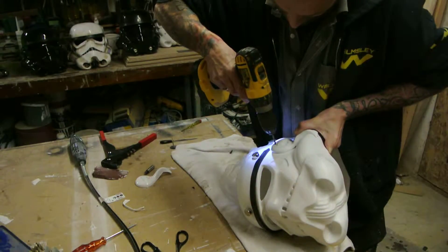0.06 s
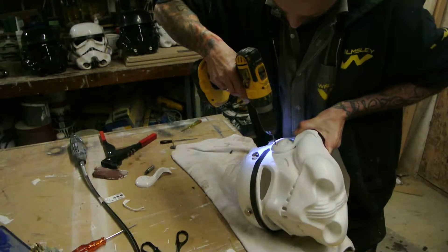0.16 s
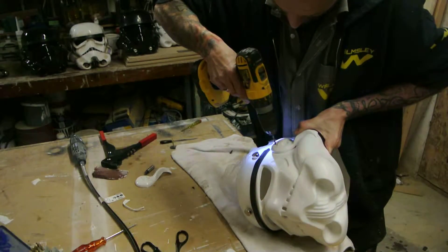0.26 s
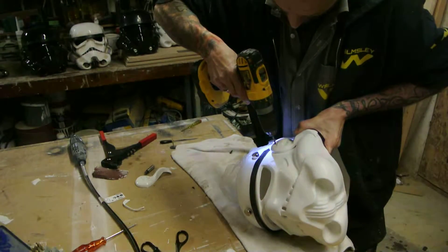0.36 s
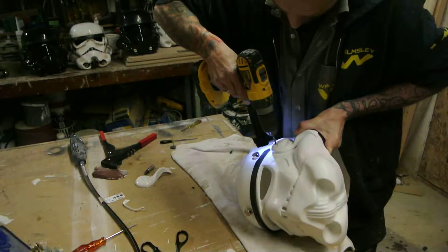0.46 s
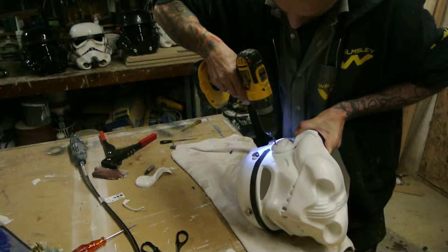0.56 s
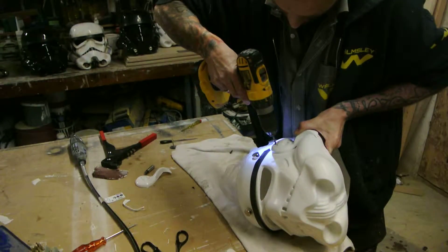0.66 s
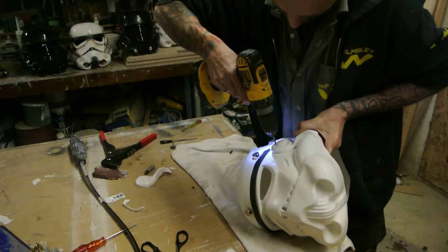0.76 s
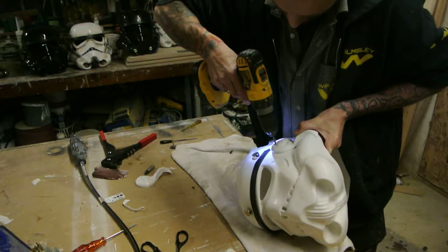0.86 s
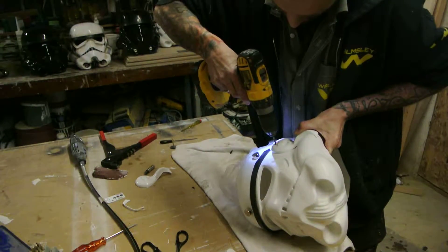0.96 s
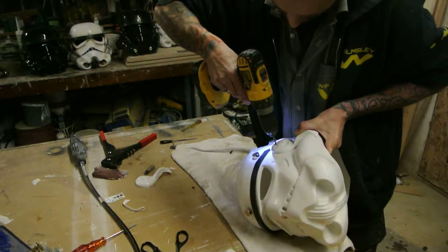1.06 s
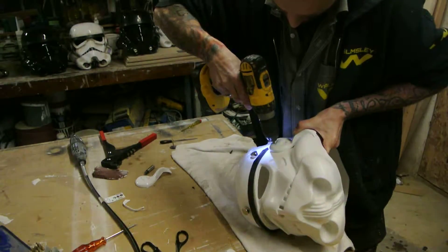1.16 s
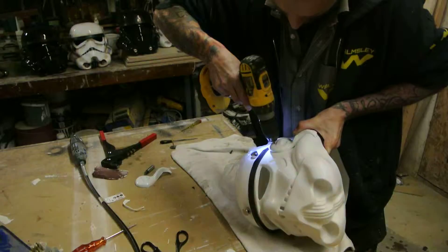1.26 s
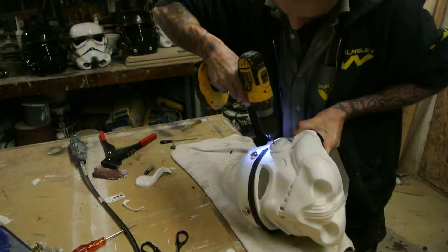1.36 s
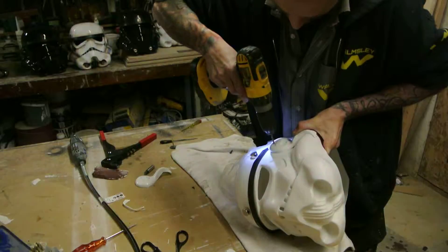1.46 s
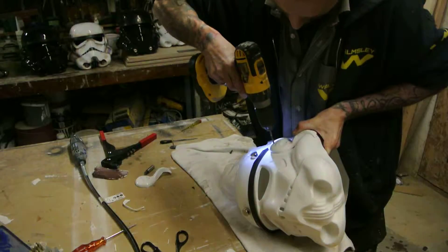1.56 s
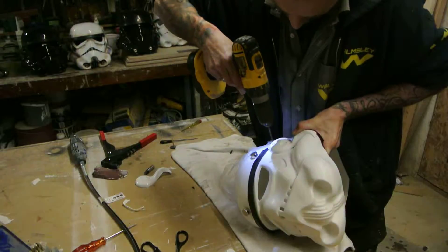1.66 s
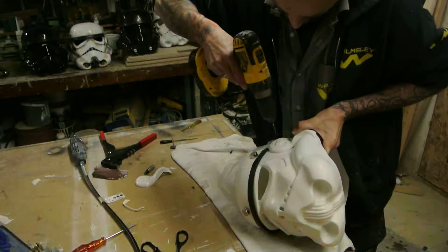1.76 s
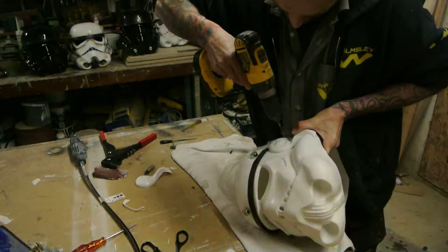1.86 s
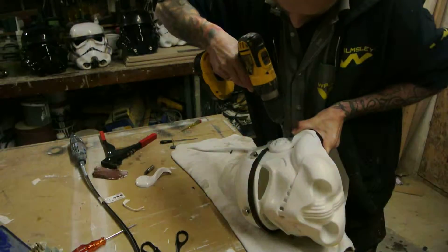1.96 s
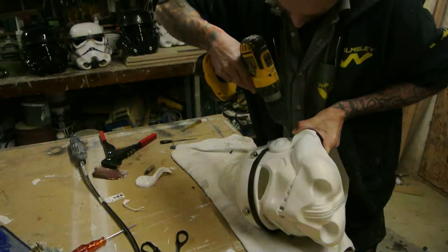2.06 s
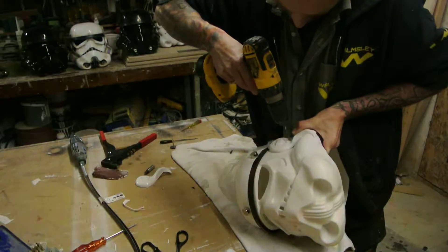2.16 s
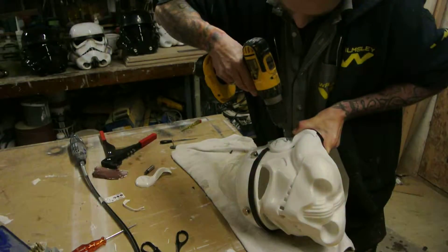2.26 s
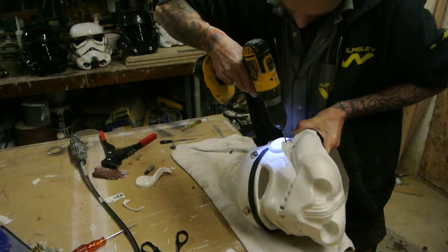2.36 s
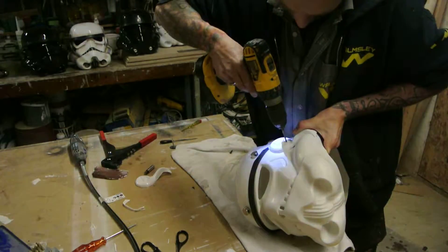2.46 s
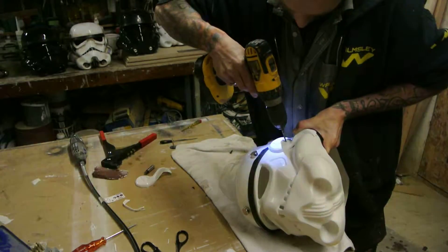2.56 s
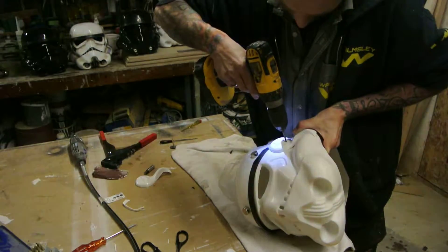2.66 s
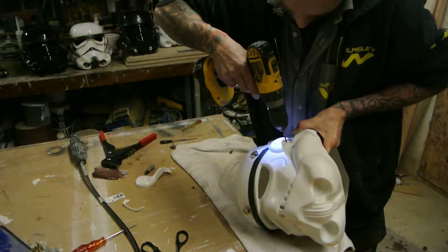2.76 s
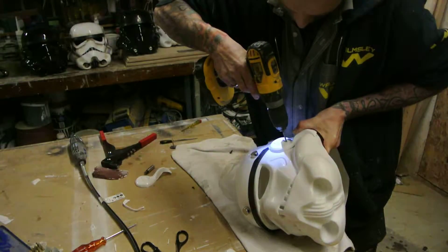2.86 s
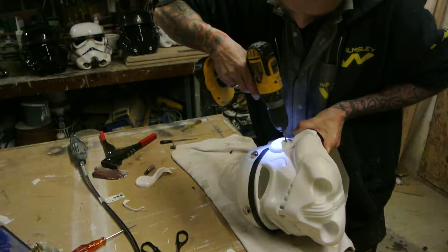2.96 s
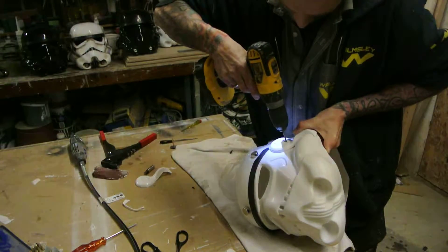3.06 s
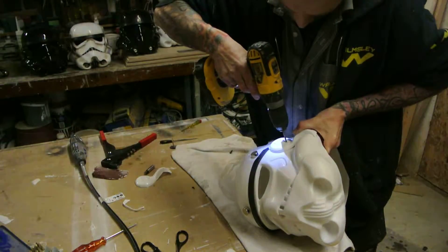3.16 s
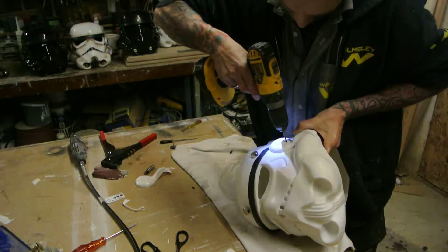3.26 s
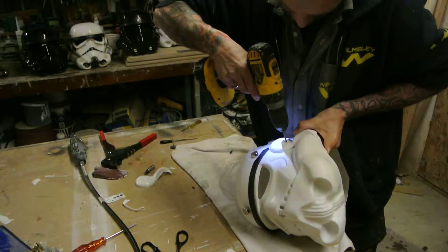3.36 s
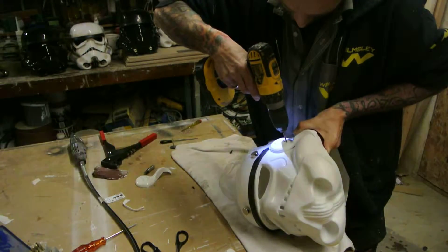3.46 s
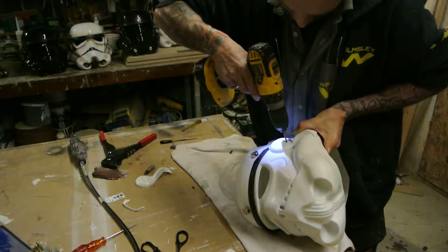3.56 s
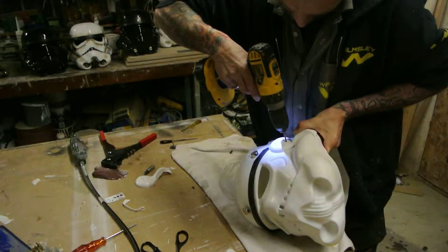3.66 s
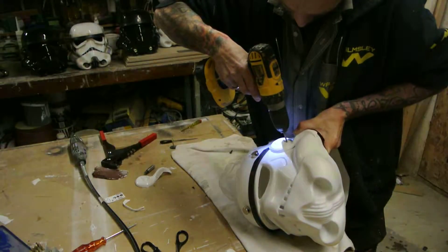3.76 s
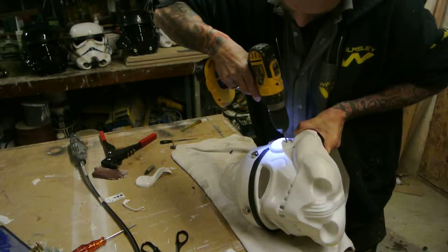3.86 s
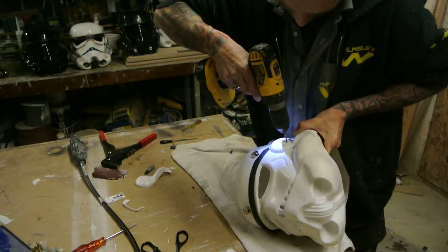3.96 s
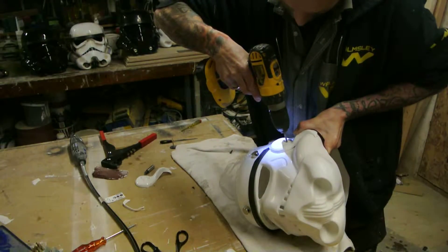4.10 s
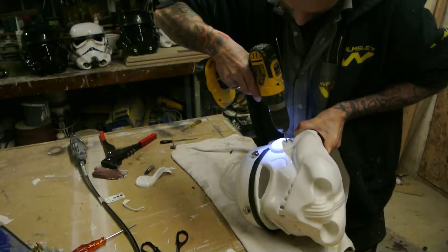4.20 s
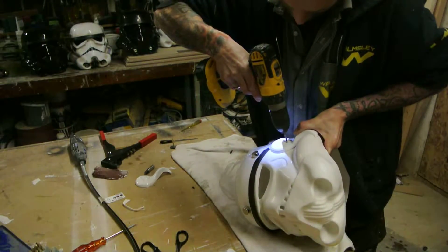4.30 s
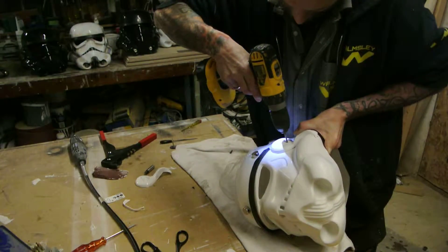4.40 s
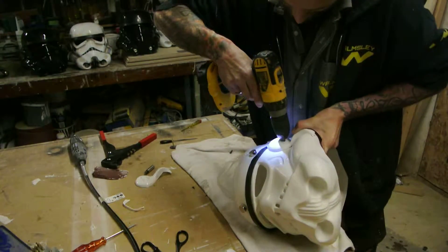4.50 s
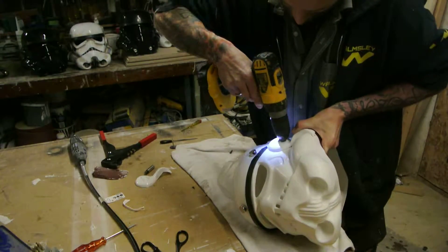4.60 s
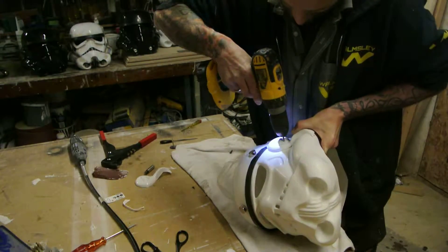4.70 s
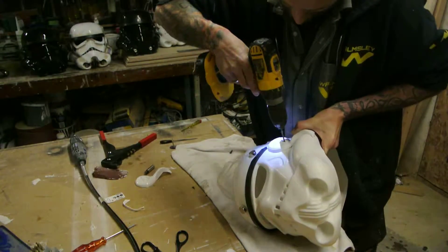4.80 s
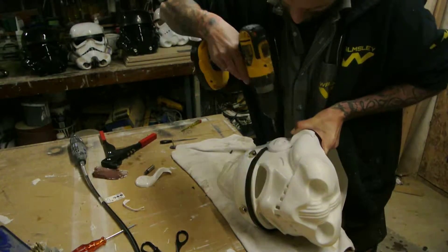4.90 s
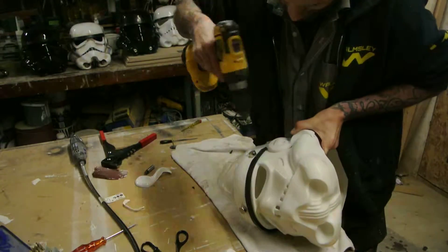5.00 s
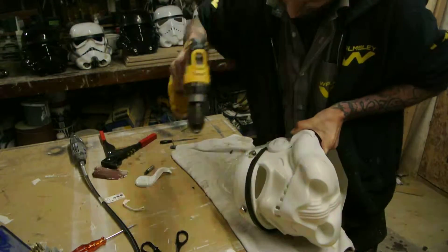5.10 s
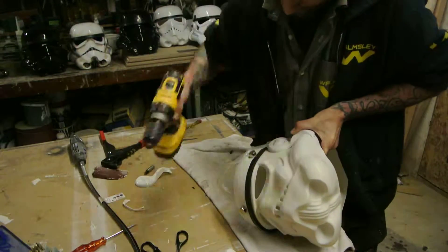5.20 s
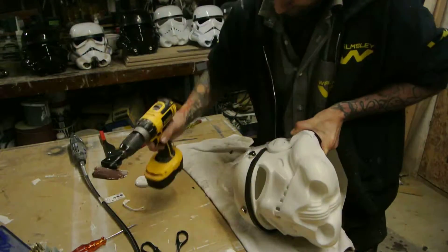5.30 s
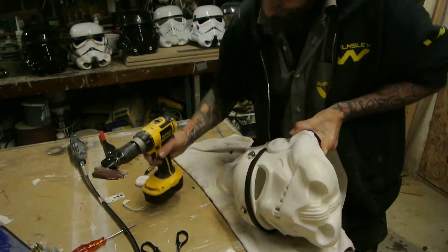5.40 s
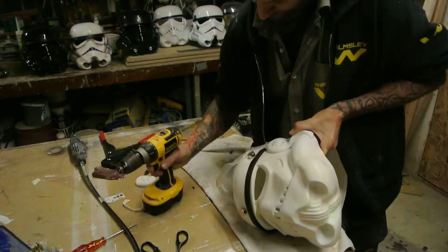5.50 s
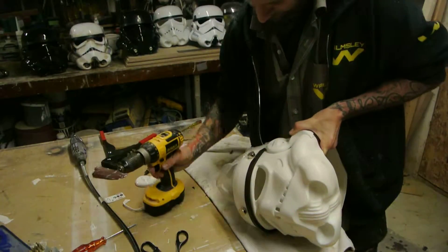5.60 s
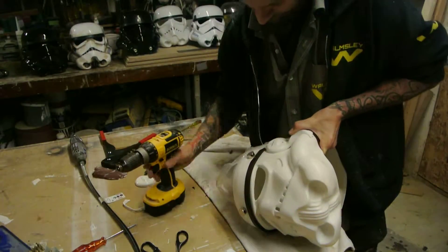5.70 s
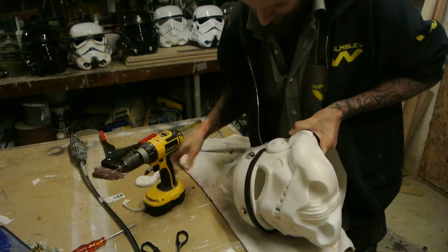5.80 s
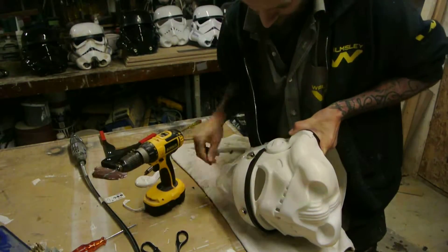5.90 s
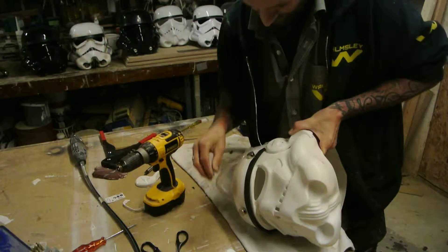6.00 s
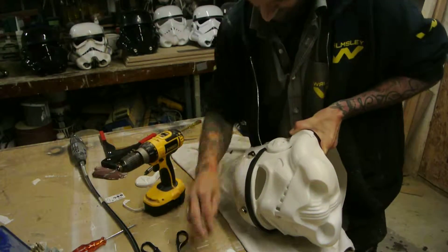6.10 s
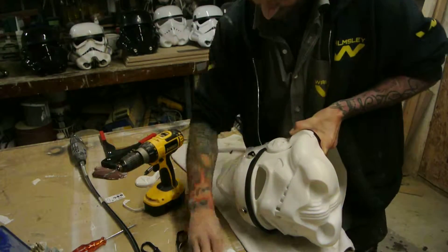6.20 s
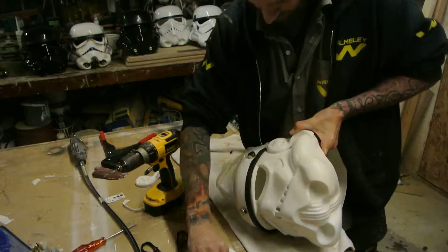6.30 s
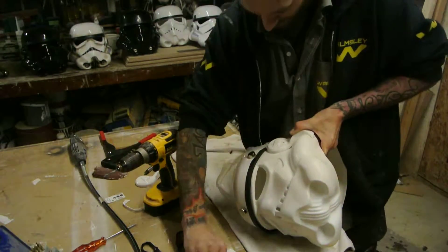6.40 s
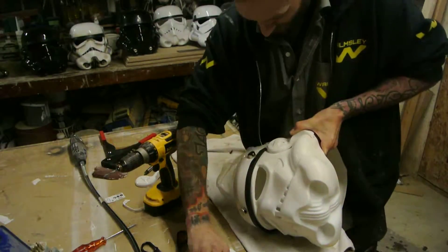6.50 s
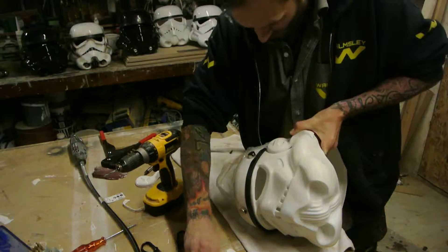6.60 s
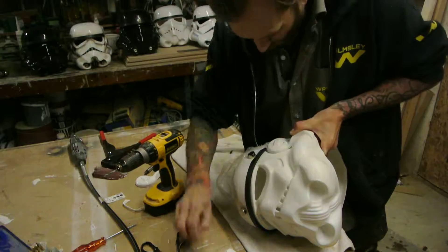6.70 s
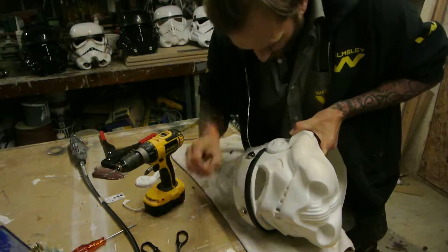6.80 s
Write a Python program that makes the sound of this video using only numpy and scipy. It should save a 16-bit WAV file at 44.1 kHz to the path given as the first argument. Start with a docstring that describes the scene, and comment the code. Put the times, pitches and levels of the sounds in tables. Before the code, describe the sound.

From the very start a cordless drill runs at full speed close to the microphone: a high gear whine, coarse bright rasp and airy fan. The plastic shell drones beneath it, biting briefly around 0.4 s and juddering harder from 1.1 to 1.5 s; the drone drops near 1.6 s as the bit breaks through. At 1.86 s the motor brakes with a fast cluster of steel clacks. A quiet gap holds soft hiss and a faint tap at 2.4 s. Thin chirps lead into a rising second burst from 2.54 s, with a deep juddering bite around 4.5 s, ending at 4.97 s in a sharp double clack. Cloth rustles lightly; at 5.59 s the drill lands on the wooden bench with a hard, rattling thud. Sleeve and palm swish, strongest at 6.45 s with a bright click, then a faint finger squeak near 6.8 s over rising hiss and slight hum. Short workshop echo.

```python
"""A cordless drill bores two holes in a hollow plastic shell, close to a two-port microphone.
Its shaft drives whining gear tones, a noisy rasp and a fan; the shell drones and judders as shaped noise.
Short noise bursts make the clacks of the spindle lock, the small knocks and the landing on a wooden bench.
Swelling noise makes the rustling sleeve and the hand that brushes over the bench top.
The place is a small workshop: the bench top answers first, then shelves and walls, over hiss and hum."""
import sys
import numpy as np
from scipy import signal
from scipy.fft import rfft, irfft, next_fast_len
from scipy.io import wavfile
from scipy.ndimage import map_coordinates

SR = 44100
rng = np.random.default_rng(int(sys.argv[2]) if len(sys.argv) > 2 else 0)


def materialize(psi):
    """Save the field psi as 16-bit PCM at rate SR to the path in sys.argv[1].

    A 1-D psi becomes a single channel; in a 2-D psi each row is a channel.
    """
    bounded = np.clip(np.atleast_2d(psi).T, -1, 1)
    quanta = np.round(bounded * 32767).astype(np.int16)
    wavfile.write(sys.argv[1], SR, quanta)


N = 302085


def amp(db):
    """Decibels to gain."""
    return 10 ** (np.asarray(db) / 20)


def unit(x):
    """Scale to rms 1."""
    return x / np.sqrt(np.mean(x ** 2) + 1e-20)


def clock():
    """The time of every sample in seconds."""
    return np.arange(N) / SR


def along(points, hz):
    """Read (frequency [Hz], value) points on a log frequency axis."""
    f, v = np.transpose(points)
    return np.interp(np.log(hz + 1), np.log(f + 1), v)


def curves(rows):
    """One value per sample for each column after the time."""
    s, *columns = np.transpose(rows)
    return [np.interp(clock(), s, column) for column in columns]


def ramp(start, length):
    """Rises from 0 at start to 1 over length seconds."""
    return np.clip((clock() - start) / length, 0, 1)


def swell(s, rise, hold, fall):
    """Gain that peaks at s and holds; rise and fall are the seconds that 20 dB take."""
    t = clock()
    before = np.maximum(s - t, 0)
    after = np.maximum(t - s - hold, 0)
    return amp(-20 * (before / abs(rise) + after / abs(fall)))


def wobble(rate):
    """A smooth random curve with rate knots a second."""
    t = clock()
    coarse = t[::32]
    knots = rng.standard_normal(int(N * rate / SR) + 4)
    return np.interp(t, coarse, map_coordinates(knots, [coarse * rate]))


def filtered(x, response):
    """Multiply the spectrum of x by a response given as a function of frequency."""
    n = x.shape[-1]
    m = next_fast_len(n + 8192)
    return irfft(rfft(x, m) * response(np.fft.rfftfreq(m, 1 / SR)), m)[..., :n]


def noise(spectrum, size=N):
    """Noise of rms 1, coloured by (frequency [Hz], relative level [dB per Hz]) points."""
    return unit(filtered(rng.standard_normal(size), lambda hz: amp(along(spectrum, hz))))


def dying(x, decay):
    """Each frequency of x fades with its own t60, the seconds that 60 dB take."""
    hz, t, z = signal.stft(x, SR, nperseg=256)
    fade = amp(-60 * t / along(decay, hz)[:, None])
    return signal.istft(z * fade, SR, nperseg=256)[1][:len(x)]


def add(track, s, sound):
    """Mix a sound into a track at time s."""
    part = track[round(s * SR):][:len(sound)]
    part += sound[:len(part)]


def blow(spectrum, t60, ring_db, ring_t60):
    """A hard contact: a short crack and a weaker dense ring."""
    t = np.arange(SR // 2) / SR
    envelope = amp(-60 * t / t60) + amp(ring_db - 60 * t / ring_t60)
    return noise(spectrum, size=len(t)) * envelope


# Diffuse sound at the two microphone ports: (frequency [Hz], left-right likeness [0-1])
PORT_LIKENESS = [(60, .7), (150, .88), (400, .6), (1000, .35), (3000, .15), (8000, 0)]


def diffuse(a, b):
    """Two unrelated signals as a stereo pair: alike in the bass, apart in the treble."""
    def turn(hz):
        return np.arccos(np.clip(along(PORT_LIKENESS, hz), -1, 1)) / 2
    mid = filtered(a, lambda hz: np.cos(turn(hz)))
    side = filtered(b, lambda hz: np.sin(turn(hz)))
    return np.array([mid + side, mid - side])


def radiated(x):
    """A small housing radiates no bass."""
    return filtered(x, lambda hz: 1 - 1 / (1 + (hz / 260) ** 8))


# Reverberation of the workshop: (frequency [Hz], t60 [s])
ROOM_DECAY = [(100, 0.16), (600, 0.35), (3000, 0.3), (12000, .24)]


def placed(x, near_db, wet_db, lag_ms):
    """Direct sound reaches the left port lag_ms late; the bench top answers at once, shelves and walls later."""
    def answer(decay, wait):
        """A stereo echo tail that starts after wait samples."""
        tails = [dying(rng.standard_normal(SR // 2), decay) for _ in range(2)]
        return diffuse(*[np.pad(h / np.linalg.norm(h), (wait, 0))[:SR // 2] for h in tails])

    near, wet = amp(near_db), amp(wet_db)
    echoes = near * answer([(1000, 0.017)], wait=12) + wet * answer(ROOM_DECAY, wait=200)
    sides = np.array([[-1], [1]])  # half the lag on each side
    direct = filtered(x, lambda hz: np.exp(1j * np.pi * hz * lag_ms / 1000 * sides))
    reflected = signal.fftconvolve(x[None], echoes, axes=1)[:, :N]
    return (direct + reflected) / np.sqrt(1 + (near ** 2 + wet ** 2) / 2)


def running(on, off, coast_t60):
    """1 while the trigger is held, then a quick fade as the motor brakes."""
    return ramp(on, .004) * amp(-60 * np.maximum(clock() - off, 0) / coast_t60)


FULL_RPS, TIRING_RPS_PER_S = 357.4, 1.0  # free turns per second at time 0; the loss as the battery tires
SQUEEZE_S, INERTIA_S = .16, .093  # the trigger goes down; the motor follows with a lag
EASE_S, EASE_SLOWS, BRAKE_S = .08, .11, .04  # easing before release, share of speed it costs, brake time constant
GRAB_S, RECOVER_S = .055, .08  # time of the speed drop; recovery time constant before half the bite is added
# The bit touches the plastic or bites into it:
# (time [s], length [s], sag at full trigger [turns per second], relative shell level [dB])
BIT_BITES = [(.39, .06, 3.6, -43), (1.13, .35, 4.8, -41.5), (2.38, .04, 0, -55), (3.69, .1, 2.8, -50),
             (4.47, .34, 4.2, -41)]


def motor(on, off):
    """Speed follows the trigger and sags in each bite; also returns strain and finger easing, both 0-1."""
    t = clock()
    squeezed = SQUEEZE_S * ramp(on, SQUEEZE_S)
    held = np.maximum(t - on - SQUEEZE_S, 0)
    behind = INERTIA_S * (1 - np.exp(-squeezed / INERTIA_S)) * np.exp(-held / INERTIA_S)
    ease = ramp(off - EASE_S, EASE_S) ** 2
    braking = np.exp(-np.maximum(t - off, 0) / BRAKE_S)
    share = (squeezed - behind) / SQUEEZE_S * (1 - EASE_SLOWS * ease) * braking
    sag = np.zeros(N)
    for s, length, rps, _ in BIT_BITES:
        recovery = np.exp(-np.maximum(t - s - GRAB_S, 0) / (RECOVER_S + length / 2))
        sag += rps * ramp(s, GRAB_S) * recovery
    strain = np.clip((1 - share) / .25, 0, 1)  # pulls harder while speeding up or braking; bites leave it alone
    return share * (FULL_RPS - TIRING_RPS_PER_S * t - sag), strain, ease


# The two strongest gear tones, as multiples of the shaft speed
STRONG_ORDERS = (14, 21)
# Their relative levels: (time [s], order 14 [dB], order 21 [dB])
STRONG_LEVELS = [(0.0, -28, -32), (1.16, -28, -29), (1.26, -33, -35), (1.5, -26, -27), (1.56, -30, -40),
                 (1.66, -41, -35), (1.78, -31, -28), (1.84, -39, -38), (2.72, -45, -47), (2.82, -35, -36),
                 (3.18, -29, -31), (3.26, -29, -47), (3.68, -31, -44), (3.82, -30, -25), (3.96, -32, -47),
                 (4.34, -29, -38), (4.82, -29, -29), (4.94, -46, -41)]
# The other shaft orders: (multiple of the speed, relative level in the first hole [dB], in the second [dB])
WEAK_ORDERS = [(1, -51, -49), (2, -52, -53), (7, -50, -44), (8, -47, -48), (12, -52, -48), (15, -46, -42),
               (16, -46, -43), (17, -33, -38), (18, -47, -49), (19, -42, -42), (20, -47, -46),
               (22, -42, -38), (23, -48, -40), (24, -47, -47), (25, -53, -44), (26, -40, -54),
               (27, -42, -42), (28, -40, -41), (29, -38, -38), (32, -48, -43), (34, -39, -41),
               (35, -44, -44), (36, -44, -44)]


def whine(hole, angle, speed, strain):
    """Shaft orders flutter with the play of the gears and press harder under strain."""
    def tone(order, flutter_db, play):
        jitter = play * (1 + 2 * strain) * wobble(90)
        phase = order * angle + rng.uniform(0, 2 * np.pi) + jitter
        return np.sqrt(2) * np.sin(phase) * amp(flutter_db * wobble(25))

    strong = sum(amp(db) * tone(order, flutter_db=1.2, play=.15)
                 for order, db in zip(STRONG_ORDERS, curves(STRONG_LEVELS)))
    weak = sum(amp(levels[hole]) * tone(order, flutter_db=2.5, play=.02 * order)
               for order, *levels in WEAK_ORDERS)
    return speed / FULL_RPS * amp(.2 + 3.5 * strain) * (strong + weak)


# Gears and fan in the drill's housing: (frequency [Hz], relative level [dB per Hz])
RASP_SPECTRUM = [(150, -56.5), (300, -23), (480, -8.5), (650, -12.3), (980, -12), (1080, -5.5),
                 (1450, -6.5), (2100, -5), (2450, -0.5), (2900, -3.5), (4500, -0.5), (12000, 0),
                 (15500, -7)]
# The gear train growls while it speeds up or brakes: (frequency [Hz], relative level [dB per Hz])
GROWL_SPECTRUM = [(250, -36.5), (450, -9.5), (620, -4.5), (1000, -15.5), (1700, -7.5), (3000, 0),
                  (4400, -5), (8000, -2), (15000, -23)]


def rasp(angle, strain, throb):
    """Gear teeth and brushes rasp in step with the shaft and growl under strain."""
    teeth = 1 + throb * (np.cos(3 * angle) + 0.61 * np.cos(4 * angle)) + 0.05 * np.cos(angle)
    steady = amp(-2.0 - 2 * strain) * noise(RASP_SPECTRUM)
    growl = amp(-8.5) * strain * noise(GROWL_SPECTRUM)
    return teeth * (steady + growl)


STRAIN_DB, RELIEF_DB = 2.5, 4.5  # the rasp gains under strain and softens as the finger eases off
EASE_DB = 8  # the tones fade as the finger eases off
GENTLE_DB, OPEN_AT = 17, .7  # the rasp starts this much softer and is whole at this share of the trigger's travel
# One row for each hole; a negative time means the drill already runs at the start:
# (trigger pressed [s], released [s], relative gear rasp [dB], tooth throb [0-1],
#  relative shell drone [dB], relative low rumble [dB], coasting t60 [s])
DRILL_RUNS = [(-1, 1.861, -18.9, .18, -48.5, -66.5, .2), (2.536, 4.966, -18.2, .06, -45.5, -65, .1)]


def drill():
    """One shaft drives the tones, the rasp and the cooling fan, whose rush leaves by vents on both sides."""
    tones, grind, fan = np.zeros((3, N))
    for hole, (on, off, rasp_db, throb, _, _, coast_t60) in enumerate(DRILL_RUNS):
        speed, strain, ease = motor(on, off)
        angle = 2 * np.pi * np.cumsum(speed * (1 + .0004 * wobble(14))) / SR
        softer_start_db = GENTLE_DB * (1 - ramp(on, OPEN_AT * SQUEEZE_S))
        effort_db = STRAIN_DB * np.sqrt(strain) - RELIEF_DB * ease ** 2 - softer_start_db
        level = amp(rasp_db + effort_db + .35 * wobble(45)) * running(on, off, coast_t60)
        tones += whine(hole, angle, speed, strain) * amp(-EASE_DB * ease) * running(on, off, coast_t60=.043)
        grind += level * rasp(angle, strain, throb)
        fan += level
    vents = amp(-7) * fan * diffuse(noise(RASP_SPECTRUM), noise(RASP_SPECTRUM))
    return radiated(tones), radiated(grind), vents


BITE_ATTACK_S, BITE_RELEASE_S = .04, .12  # time to rise and to fall by 20 dB
THROUGH_S, THROUGH_DB = 1.58, -14  # the first hole breaks through and the shell's drone drops
# Resonances of the plastic shell under the bit: (frequency [Hz], width [Hz], relative level [dB])
SHELL_MODES = [(180, 12, -12), (222, 40, -15), (276, 20, 1), (324, 16, 0), (345, 110, -2)]


def boring():
    """The bit's edges shake the shell; a deep bite makes it louder and sets it juddering lower down."""
    def body(f):
        return sum(amp(db) * (f * w) ** 2 / ((c * c - f * f) ** 2 + (f * w) ** 2) for c, w, db in SHELL_MODES)

    bite = sum(amp(db) * swell(s + BITE_ATTACK_S, BITE_ATTACK_S, length - BITE_ATTACK_S, BITE_RELEASE_S)
               for s, length, _, db in BIT_BITES)
    drone, shake = np.zeros(N), np.zeros(N)
    for on, off, _, _, drone_db, rumble_db, coast_t60 in DRILL_RUNS:
        turning = running(on, off, coast_t60) * ramp(on, .05)
        through_db = THROUGH_DB * (on < THROUGH_S) * ramp(THROUGH_S, .1)
        drone += turning * amp(drone_db + through_db)
        shake += turning * amp(rumble_db)
    resonance = unit(filtered(rng.standard_normal(N), body))
    shell = np.hypot(drone, bite) * amp(-3.1 + 1.1 * wobble(40)) * resonance
    judder_noise = noise([(70, -58.5), (140, -14), (215, 3), (260, -3), (400, -1), (700, -35)])
    judder = bite * amp(-6 + 1.7 * wobble(35)) * judder_noise
    rumble = shake * noise([(25, -40), (66, -2.5), (110, -14), (170, -7), (400, -51)])
    return shell + judder + rumble


# Background hiss, which sinks around loud sounds and swells back: (time [s], level [dB])
HISS_LEVEL = [(0, -67), (2.13, -66), (2.45, -55), (2.7, -60.5), (5.2, -63), (5.38, -57), (5.6, -59),
              (5.82, -54), (6.85, -50.5)]
# Colour of the hiss: (frequency [Hz], relative level [dB per Hz])
HISS_SPECTRUM = [(20, -13), (40, -15), (75, -8), (125, -14), (250, -11), (650, -12.5), (1100, -15),
                 (4000, -17.5), (13500, -20.5), (16000, -28)]
# Tones that rise and sink with the hiss: (frequency [Hz], level over the hiss [dB])
BACKGROUND_TONES = [(98, -18.5), (13862, -29.5)]


def background():
    """Soft diffuse hiss with a low hum and a thin high tone, all on one level curve."""
    hum = sum(amp(db) * np.sqrt(2) * np.sin(2 * np.pi * hz * clock()) for hz, db in BACKGROUND_TONES)
    return amp(curves(HISS_LEVEL)[0]) * (diffuse(noise(HISS_SPECTRUM), noise(HISS_SPECTRUM)) + hum)


# The spindle lock catches as the motor brakes, then rebounds: (time [s], relative level [dB])
LOCK_CLACKS = [(1.851, -7), (1.888, -8), (1.894, -8), (1.938, -18.5), (4.9665, -2), (4.9715, -7),
               (4.995, -18), (5.0005, -13)]
# Colour of the steel lock: (frequency [Hz], relative level [dB per Hz])
STEEL_SPECTRUM = [(100, -62), (250, -33.5), (480, -2), (1000, -7), (1700, -0.5), (3000, 0), (5600, -1.5),
                  (12200, 1.5), (15800, -8)]


def clacks():
    """The steel spindle lock snaps shut and rebounds, each contact a crack with a short ring."""
    out = np.zeros(N)
    for s, db in LOCK_CLACKS:
        add(out, s, amp(db - 5.5) * blow(STEEL_SPECTRUM, t60=0.014, ring_db=-15, ring_t60=0.042))
    return out


# Small knocks of the hands: (time [s], relative level [dB], share of bright click [0-1])
HAND_TAPS = [(2.411, -52, .15), (6.363, -40, 0), (6.4507, -19.5, 1)]
# Bright click: (frequency [Hz], relative level [dB per Hz])
CLICK_SPECTRUM = [(100, -35), (430, -24.5), (760, -3), (1840, -4), (3180, 4), (5400, 2), (8200, -20),
                  (15500, -20.5)]
# Dull pat: (frequency [Hz], relative level [dB per Hz])
PAT_SPECTRUM = [(40, -25), (70, -14), (160, -17), (300, -9), (550, -8), (750, -6), (930, -8), (1300, -20),
                (3000, -14), (8000, -35)]
# Strokes of sleeve and palm; rise and fall span 20 dB:
# (peak time [s], rise [s], fall [s], relative rub level [dB], relative swish level [dB])
HAND_STROKES = [(5.21, .08, .15, -72, -61), (5.42, .3, .4, -70, -62), (5.93, .15, .2, -62, -55.5),
                (6.2, .35, .25, -58, -55.5), (6.445, .075, .045, -35, -35.5), (6.55, .1, .13, -39, -51),
                (6.655, .025, .035, -56, -44), (6.8, .2, .1, -55, -59)]
# Low rub: (frequency [Hz], relative level [dB per Hz])
RUB_SPECTRUM = [(20, -30), (40, -14), (70, -7), (110, -11), (400, -8.5), (850, 2), (1300, -1.5),
                (2000, -5.5), (4000, -9.5), (8000, -27.5)]
# High swish: (frequency [Hz], relative level [dB per Hz])
SWISH_SPECTRUM = [(800, -15), (2800, -3), (5500, -3.5), (8000, -2.5), (12500, -1), (15500, -3.5)]
# A finger drags on the bench: (peak time [s], rise [s], fall [s], relative level [dB])
FINGER_SQUEAK = (6.8, .12, .09, -54)


def hands():
    """Cloth and skin slide in small catches; fingers knock on things."""
    rub = sum(amp(db) * swell(s, rise, 0, fall) for s, rise, fall, db, _ in HAND_STROKES)
    swish = sum(amp(db) * swell(s, rise, 0, fall) for s, rise, fall, _, db in HAND_STROKES)
    out = rub * amp(-5.0 + 2.6 * wobble(60)) * noise(RUB_SPECTRUM)
    out += swish * amp(1.2 * wobble(70)) * noise(SWISH_SPECTRUM)

    s, rise, fall, db = FINGER_SQUEAK
    squeak = noise([(900, -49.5), (1215, -19.5), (1265, 0), (1320, -13), (1800, -50)])
    out += amp(db) * swell(s, rise, 0, fall) * squeak

    for s, db, bright in HAND_TAPS:
        click = blow(CLICK_SPECTRUM, t60=.008, ring_db=-13, ring_t60=0.086)
        pat = blow(PAT_SPECTRUM, t60=.04, ring_db=-14, ring_t60=.1)
        add(out, s, amp(db) * (bright * click + (1 - bright) * pat))
    return out


CHIRP_ATTACK_S, CHIRP_RELEASE_S = .003, .012  # time to rise and to fall by 20 dB
# The speed controller sings while the trigger is part way down: (time [s], hold [s], relative level [dB])
CONTROLLER_CHIRPS = [(2.438, .003, -36.5), (2.537, .028, -30), (2.672, .022, -23)]


def controller():
    """The speed controller chirps at part throttle: narrow noise near 6 kHz in short swells."""
    sing = noise([(1000, -70), (4000, -39), (5400, -14), (5860, 6), (6300, -8), (8200, -25), (11000, -36)])
    return sing * sum(amp(db) * swell(s, CHIRP_ATTACK_S, hold, CHIRP_RELEASE_S)
                      for s, hold, db in CONTROLLER_CHIRPS)


# The battery lands on the bench and rocks:
# (time [s], relative crack level [dB], relative ring of the boards [dB])
BENCH_CONTACTS = [(5.5896, -23.5, -10), (5.5908, -8.7, -15), (5.597, -26.5, -32), (5.609, -28, -22),
                  (5.66, -46, -12)]
# Colour of crack and rattle: (frequency [Hz], relative level [dB per Hz])
THUD_SPECTRUM = [(24, -36), (55, -28), (150, -14), (225, 1), (320, -11), (550, -7), (1050, 1), (1600, 4),
                 (2500, -3), (3500, -1.5), (5500, -13), (7300, -6.5), (8800, -16), (12400, -9),
                 (16000, -20)]
# Fading of the rattle: (frequency [Hz], t60 [s])
RATTLE_DECAY = [(60, 0.52), (250, 0.23), (600, .13), (3000, 0.17), (10000, .05)]
# Modes of bench and drill housing: (frequency [Hz], relative level [dB], t60 [s])
BENCH_MODES = [(67.7, -36, 0.47), (132, -36, 0.3), (217, -17.5, 0.1), (247, -23.5, 0.22), (340, -22, 0.11),
               (521, -22.5, 0.12), (840, -25, 0.1), (1213, -25, .2), (1525, -36, .18), (1656, -44, .18),
               (2685, -40, .2)]


def landing():
    """The battery hits the bench edge first, then flat, and rocks; every contact rings the boards."""
    out, t = np.zeros(N), np.arange(SR // 2) / SR
    for s, crack_db, ring_db in BENCH_CONTACTS:
        rattle = dying(noise(THUD_SPECTRUM, size=len(t)), RATTLE_DECAY)
        crack = blow(THUD_SPECTRUM, t60=0.029, ring_db=-25, ring_t60=.06)
        add(out, s, amp(crack_db) * (crack + amp(-14.5) * rattle))
        reach_hz = 5000 * amp(crack_db / 2)  # a soft contact stirs only the low modes
        for hz, db, t60 in BENCH_MODES:
            mode = amp(ring_db + db - 60 * t / t60) * np.sin(2 * np.pi * hz * t)
            add(out, s, mode / (1 + (hz / reach_hz) ** 2))
    return out


def scene():
    """Drill, bench and hands in the workshop, each with its own share of bench and room echo."""
    tones, grind, vents = drill()
    rough = grind + boring() + controller() + radiated(clacks())
    tool = placed(tones, near_db=-16, wet_db=-16, lag_ms=0.014)
    tool += placed(rough, near_db=-14.5, wet_db=-6.5, lag_ms=0.019)
    bench = placed(landing(), near_db=-7, wet_db=-6.5, lag_ms=-0.03)  # negative: the right port hears it late
    bench += placed(hands(), near_db=-16.5, wet_db=-3.5, lag_ms=0.023)
    return tool + vents + bench + background()


LOW_CUT_HZ, TOP_HZ = 38, 16000


def record(dry):
    """The camera clips at full scale, drops the deepest bass and keeps nothing above its band limit."""
    def response(hz):
        return (hz < TOP_HZ) * (1 - 1 / (1 + (hz / LOW_CUT_HZ) ** 4))
    return filtered(np.clip(dry, -1, 1), response)


dry = scene()
out = record(dry)
materialize(out)
```